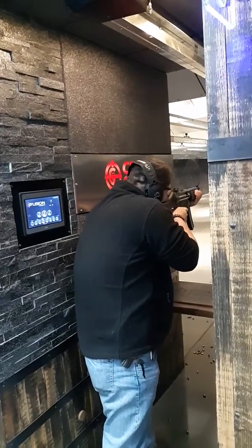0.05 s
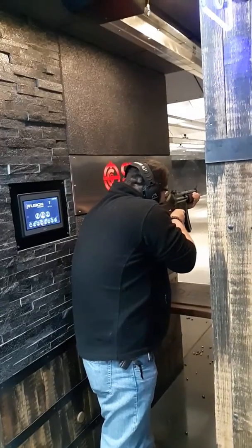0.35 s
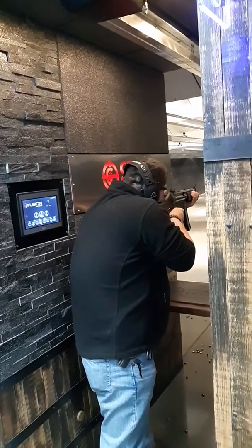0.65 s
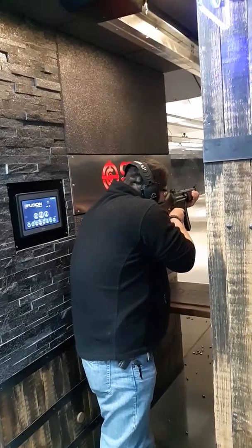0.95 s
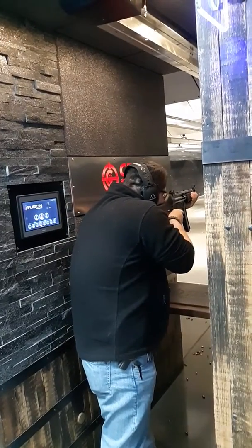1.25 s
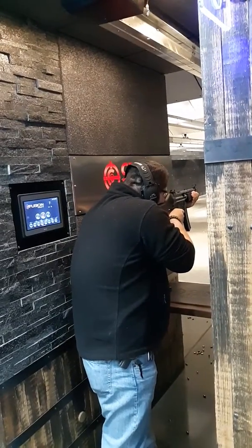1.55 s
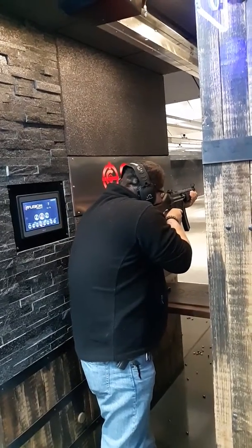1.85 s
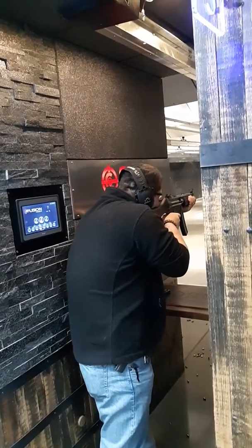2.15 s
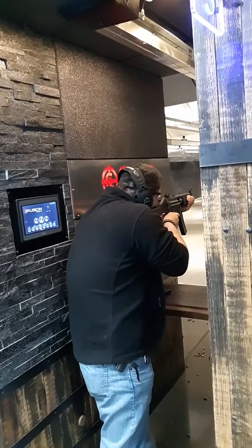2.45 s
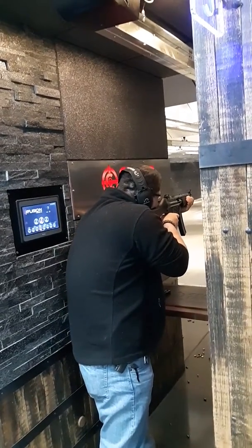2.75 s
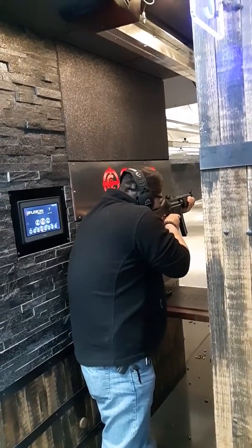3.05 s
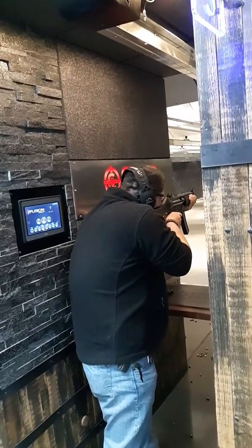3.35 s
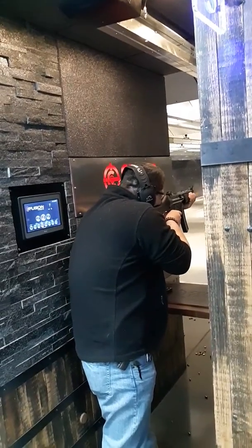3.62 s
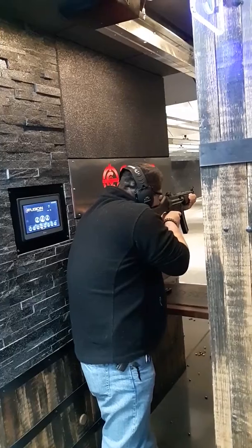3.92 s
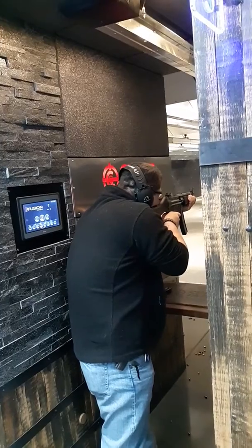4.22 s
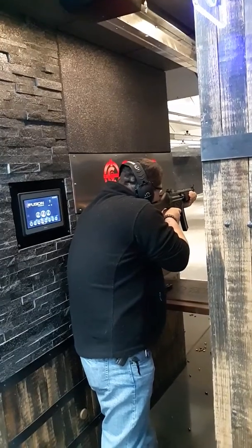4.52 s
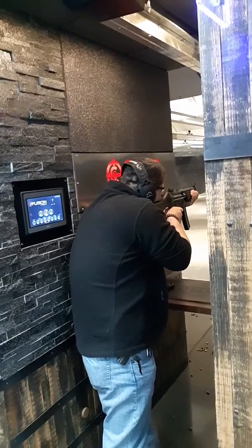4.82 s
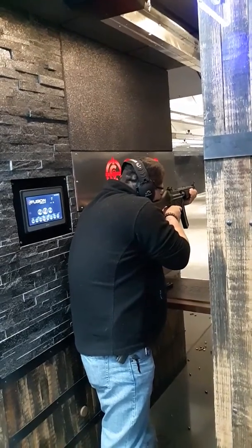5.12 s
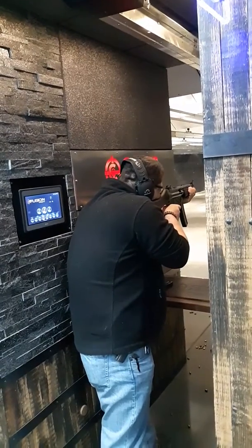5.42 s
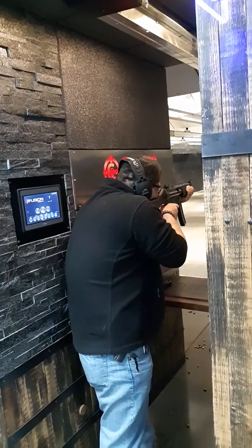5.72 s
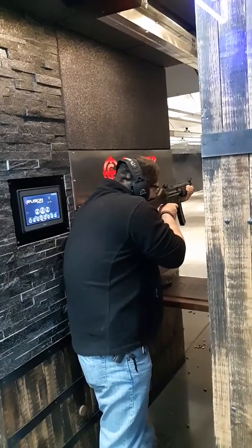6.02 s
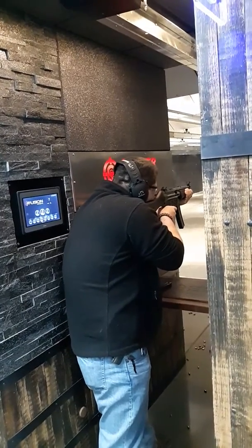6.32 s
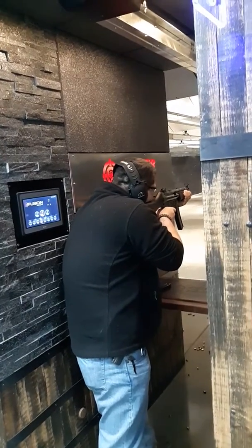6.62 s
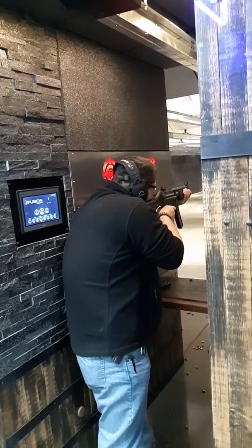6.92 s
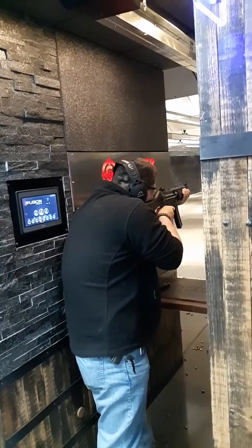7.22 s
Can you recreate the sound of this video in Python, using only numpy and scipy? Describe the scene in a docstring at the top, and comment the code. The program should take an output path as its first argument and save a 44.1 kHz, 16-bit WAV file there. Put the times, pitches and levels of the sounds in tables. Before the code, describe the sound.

The roar of a shot just fired dies away in an indoor shooting range. A submachine gun then fires three single shots, about two seconds apart, each a loud, bright blast with a metallic clack and about a second of echo. Spent brass cases bounce and ring faintly on the floor between them. Heard from behind the shooter, the reports sound flattened, and the ventilation rush drops after each one and swells back.

```python
"""First comes the roar of a shot just fired: a submachine gun on an indoor range, heard from behind.
Three more shots follow, each a clack of the action, a bright blast fluttering in the booth, two knocks
of the bolt and the long reverberation of the hall. Spent brass cases bounce and ring on the floor.
The recorder's limiter flattens each report, and its gain control ducks the rush of the ventilation,
which swells back between shots."""
import sys
import numpy as np
from scipy import signal
from scipy.fft import rfft, irfft, next_fast_len
from scipy.io import wavfile
from scipy.ndimage import uniform_filter1d, minimum_filter1d

SR = 44100
rng = np.random.default_rng(int(sys.argv[2]) if len(sys.argv) > 2 else 0)


def inscribe(sig):
    """Save sig as 16-bit PCM at rate SR to the path in sys.argv[1].

    A 1-D sig is mono; a 2-D sig holds one channel per row.
    Samples are clipped to [-1, 1] before scaling.
    """
    pcm = np.round(np.clip(np.atleast_2d(sig).T, -1, 1) * 32767)
    wavfile.write(sys.argv[1], SR, pcm.astype(np.int16))


N = 320607
AGE = np.arange(int(2.2 * SR)) / SR   # time since an event began [s]

# shots and the hall's response: (time [s], roar level [dB], low swell re roar [dB], treble lift [dB])
SHOT_EVENTS = [(-.105, -1.5, -19, 2.5), (1.7015, -2, -28.5, 4.5), (3.631, -1, -31, 4.5),
               (5.8975, -0.5, -29.5, 0.5)]
# spectrum of the muzzle blast: (frequency [Hz], relative density [dB])
BLAST_SPECTRUM = [(30, -20), (110, -31.5), (200, -5), (330, 7), (650, 3), (1100, -3.5), (2400, -8.5),
                  (4200, -11), (6500, -11.5), (8300, -24), (11500, -17.5), (15500, -23)]
# the bolt hits its rear stop, then slams shut: (delay [s], knock [dB], ring [dB], ring frequency [Hz])
BOLT_IMPACTS = [(0.038, 26.5, 24, 2840), (.058, 27.5, 31, 2190)]
# spectrum of the reverberant field: (frequency [Hz], relative density [dB])
HALL_SPECTRUM = [(30, -21), (85, -28.5), (135, -16.5), (250, -1), (600, 2.5), (1100, -5.5), (1700, -6),
                 (3000, -13), (3700, -8.5), (4900, -13), (6000, -5.5), (7100, -13.5), (7700, -24.5),
                 (11500, -17.5), (15500, -31.5)]
# narrow peaks and dips that colour the lane's reverberation: (frequency [Hz], width [Hz], lift [dB])
LANE_COLOUR = [(150.3, 8.6, 12.5), (186, 71, -2.5), (221, 69, 9), (373, 8.3, 6.5), (488, 39, -3.5),
               (551, 22, -2.5), (712, 15, 2), (1003, 17, 1), (1450, 22, -1), (1808, 30, 0), (1984, 22, 3),
               (2750, 50, -3.5), (3930, 33, -3)]
# reverberation time of the hall: (frequency [Hz], t60 [s])
REVERB_TIMES = [(50, 1.2), (130, 0.97), (250, 0.88), (550, 1.01), (1100, 0.99), (2100, 1.026), (4000, .83),
                (6000, 0.61), (9000, 0.45), (15000, 0.19)]
# cases landing: (time [s], level [dB], ring frequency [Hz], ring t60 [s], clack re level [dB])
CASE_LANDINGS = [(0.38, -29, 10600, .22, -12), (1.025, -35.5, 10650, 0.26, -15),
                 (1.52, -36, 10600, .28, -5), (2.1, -42, 10680, .35, -12), (2.496, -34, 10580, 0.36, -10),
                 (3.37, -37, 10600, 0.2, -16), (4.347, -27, 10540, .25, -14),
                 (5.238, -40.5, 10130, 0.9, 4.5), (5.704, -46.5, 10640, 0.33, -10)]
# spectrum of a case ticking on the floor: (frequency [Hz], relative density [dB])
TICK_SPECTRUM = [(2000, -20), (5400, -1), (8000, -10), (10600, 6), (13000, -7), (15500, 2)]
# spectrum of its duller clack as it tips over: (frequency [Hz], relative density [dB])
CLACK_SPECTRUM = [(2500, -25), (5400, 2), (7500, -23.5)]
# spectrum of the moving air: (frequency [Hz], relative density [dB])
VENT_SPECTRUM = [(25, -26.5), (76, -17.5), (130, -7.5), (200, -4.5), (354, 0), (545, -2.5), (962, -9),
                 (1700, -9), (2760, -16), (5880, -21), (6900, -27.5), (7800, -40.5), (11000, -38.5),
                 (16000, -52)]
# likeness of the two channels in the diffuse field: (frequency [Hz], correlation [-1 to 1])
STEREO_CORRELATION = [(50, .84), (90, .86), (140, .97), (300, .82), (640, .65), (1300, .32), (2800, 0),
                      (5400, -.07), (12000, 0)]


def gun(blast_db=37, hall_db=24, clack_db=-22, clack_t60=.08, lock_time_s=.0091, treble_hz=1100):
    """Superposition: the action clacks just before each shot; blast, bolt and reverberation follow."""
    out = np.zeros((2, N))
    booth_paths, hall_paths = noise(BLAST_SPECTRUM), noise(HALL_SPECTRUM, colour=LANE_COLOUR)
    clumps, swell = echo_clumps(), low_swell()
    for time_s, level_db, swell_db, treble_db in SHOT_EVENTS:
        roar = from_db(hall_db + level_db) * (hall(hall_paths, clumps) + from_db(swell_db) * swell)
        roar += (from_db(treble_db) - 1) * butterworth(roar, treble_hz, "high", order=1)
        add(out, time_s - lock_time_s, from_db(clack_db) * steel_knock(clack_t60))
        add(out, time_s, from_db(blast_db) * muzzle_blast(booth_paths) + bolt() + roar)
    return out


def muzzle_blast(paths, crack_t60=.12, crack_rise_s=.0015, boom_t60=.073, boom_rise_s=.012, split_hz=1000):
    """Incoherent arrivals add in power: each brings a sudden high crack and a low boom that swells."""
    pressure = vary_short_waves(paths, noise(BLAST_SPECTRUM))
    crack_power, boom_power = 0, 0
    for delay, crack_db, boom_db in blast_arrivals():
        growth = (np.maximum(AGE - delay, 0) / boom_rise_s) ** 2
        swell = 2 * growth / (1 + growth / 2)
        crack_power += (from_db(crack_db) * decay(crack_t60, delay)) ** 2
        boom_power += (from_db(boom_db) * swell * decay(boom_t60, delay)) ** 2
    onset = rise(crack_rise_s)   # the shooter's body rounds the first front
    crack = butterworth(pressure, split_hz, "high") * np.sqrt(crack_power) * onset
    boom = butterworth(pressure, split_hz, "low") * np.sqrt(boom_power)
    return crack + boom


def blast_arrivals(round_trip_s=.0236, crack_loss_db=5, boom_loss_db=3, trips=3):
    """Flutter echo between the booth walls weakens each trip: (delay [s], crack [dB], boom [dB])."""
    direct, far_wall = (0, 3.7, 1.45), (.156, -27, -27)
    flutter = [((k + 1) * round_trip_s, .4 - k * crack_loss_db, 3 - k * boom_loss_db)
               for k in range(trips)]
    return [direct, *flutter, far_wall]


def bolt(knock_t60=.093, ring_t60=.089, skirt_ratio=5.832):
    """Impact excitation: each stop of the bolt knocks the receiver into a broad, damped resonance."""
    out = 0
    for delay, knock_db, ring_db, hz in BOLT_IMPACTS:
        ring = noise([(hz / skirt_ratio, -40), (hz, 0), (hz * skirt_ratio, -40)]) * decay(ring_t60)
        hit = from_db(knock_db) * steel_knock(knock_t60) + from_db(ring_db) * ring
        out = out + np.pad(hit, [(0, 0), (int(delay * SR), 0)])[:, :len(AGE)]
    return out


def steel_knock(t60):
    """A brief contact has a wide spectrum: steel on steel gives a short, bright burst."""
    return unit_rms(butterworth(noise(BLAST_SPECTRUM), 2000, "high", order=1)) * decay(t60)


def hall(paths, clumps, rise_s=.024, linger_db=-38, linger_t60=3.22, far_hz=2200):
    """Reverberation with two slopes: the hall roars and dies away while its far end lingers faintly."""
    echoes = vary_short_waves(paths, noise(HALL_SPECTRUM, colour=LANE_COLOUR))
    far_end = butterworth(noise(HALL_SPECTRUM, colour=LANE_COLOUR), far_hz, "low")
    linger = from_db(linger_db) * far_end * decay(linger_t60)
    return (decay_by_band(echoes, clumps) + linger) * rise(rise_s)


def decay_by_band(echoes, clumps):
    """Absorption depends on frequency: each band wavers with its own gain and dies at its own rate."""
    padded = next_fast_len(len(AGE))
    hz, spectrum = np.fft.rfftfreq(padded, 1 / SR), rfft(echoes, padded)
    centres, t60s = np.transpose(REVERB_TIMES)
    shares = [at_hz(np.c_[centres, weights], hz) for weights in np.eye(len(centres))]
    bands = [irfft(spectrum * share, padded)[:, :len(AGE)] for share in shares]
    return sum(band * gain * decay(t60) for band, gain, t60 in zip(bands, clumps, t60s))


def echo_clumps(depth_db=2.5, knots_per_s=70, merge_s=.5):
    """Echo density grows with time, so clumps merge: a random gain for each band that settles to one."""
    knots = rng.standard_normal((len(REVERB_TIMES), 400))
    spread_db = depth_db * np.exp(-AGE / merge_s)
    return [from_db(spread_db * np.interp(AGE * knots_per_s, np.arange(len(row)), row)) for row in knots]


def vary_short_waves(paths, fresh, split_hz=1400):
    """Interference: long waves repeat on every shot; short ones change a little from shot to shot."""
    return butterworth(paths, split_hz, "low") + butterworth(fresh, split_hz, "high")


def low_swell(hz=149.2, delay_s=.21, rise_s=.02, t60=.46, skirt_ratio=1.3225):
    """The lowest resonance needs time to build up along the hall, so its deep hum comes late."""
    hum = noise([(hz / 4, -50), (hz / skirt_ratio, -25), (hz, 0), (hz * skirt_ratio, -45),
                 (hz * 10, -120)])
    return hum * rise(rise_s, delay_s) * decay(t60, delay_s)


def brass(tick_db=-4, tick_t60=.047, bounce_s=.0095, bounce_db=-2, touches=6, tip_s=.015, clack_t60=.1):
    """Inelastic collisions: a case clatters end to end in ever weaker touches, rings and tips over."""
    out = np.zeros((2, N))
    for time_s, level_db, hz, t60, clack_db in CASE_LANDINGS:
        delays = np.r_[0, np.cumsum(bounce_s * rng.uniform(.5, 1.5, touches - 1))]
        power = sum((from_db(k * bounce_db) * decay(tick_t60, s)) ** 2 for k, s in enumerate(delays))
        ticks = from_db(tick_db) * np.sqrt(power) * noise(TICK_SPECTRUM)
        clack = from_db(clack_db) * decay(clack_t60, tip_s) * noise(CLACK_SPECTRUM)
        add(out, time_s, from_db(level_db) * (ticks + clack + case_ring(hz, t60)))
    return out


def case_ring(hz, t60, split_hz=55, pair_db=-7, spin_hz=14, spin_depth=.45, smear_db=-3, smear_hz=170):
    """Mode splitting: the slightly oval mouth rings with two close tones that throb as it tumbles."""
    phases = rng.uniform(0, 2 * np.pi, (3, 2, 1))
    tone = np.sin(2 * np.pi * hz * AGE + phases[0])
    pair = tone + from_db(pair_db) * np.sin(2 * np.pi * (hz + split_hz) * AGE + phases[1])
    tumble = 1 + spin_depth * np.cos(2 * np.pi * spin_hz * AGE + phases[2, 0])
    envelope = decay(t60) + from_db(-26.5) * decay(t60=.85)   # the case sings on as it rolls
    jitter = unit_rms(butterworth(rng.standard_normal((2, len(AGE))), smear_hz, "low"))
    smear = from_db(smear_db) * tone * jitter * decay(t60=.19)   # the clatter blurs the tone at first
    return (pair * tumble * envelope + smear) * rise(rise_s=.007)


def ventilation(air_db=-37.5, whine_db=-75, whine_hz=10000):
    """Fan noise is broadband plus tonal: air rushes down the lanes and the drive whines faintly."""
    whine = np.sin(2 * np.pi * whine_hz * np.arange(N) / SR)
    return from_db(air_db) * noise(VENT_SPECTRUM, N) + from_db(whine_db) * whine


def noise(spectrum, size=len(AGE), colour=()):
    """A diffuse field: partly correlated stereo noise of rms 1, with optional narrow peaks and dips."""
    padded = next_fast_len(size)
    hz = np.fft.rfftfreq(padded, 1 / SR)
    colour_db = sum(db / (1 + (2 * (hz - centre) / width) ** 2) for centre, width, db in colour)
    correlation = at_hz(STEREO_CORRELATION, hz)
    mid, side = rfft(rng.standard_normal((2, padded)))
    pair = np.sqrt(1 + correlation) * mid + np.sqrt(1 - correlation) * side * [[1], [-1]]
    return unit_rms(irfft(pair * from_db(at_hz(spectrum, hz) + colour_db), padded)[:, :size])


def from_db(db):
    """Amplitude ratio of a level in decibels."""
    return 10 ** (np.asarray(db) / 20)


def unit_rms(x):
    """Normalisation to a mean power of one."""
    return x / np.sqrt(np.mean(x ** 2) + 1e-20)


def at_hz(points, hz):
    """Interpolation of a table on a log-frequency axis."""
    frequencies, values = np.transpose(points)
    return np.interp(np.log(hz + 1), np.log(frequencies), values)


def rise(rise_s, delay=0):
    """Exponential build-up from 0 to 1 after a delay."""
    return 1 - np.exp(-np.maximum(AGE - delay, 0) / rise_s)


def decay(t60, delay=0):
    """Exponential decay that starts after a delay and falls 60 dB in t60 seconds."""
    return (AGE >= delay) * from_db(-60 * np.maximum(AGE - delay, 0) / t60)


def butterworth(x, hz, side, order=2):
    """Maximally flat low-pass or high-pass filter."""
    return signal.sosfilt(signal.butter(order, hz, side, fs=SR, output="sos"), x)


def add(out, time_s, sound):
    """Superposition of a sound on the mix from time_s on."""
    start = int(round(time_s * SR))
    first, last = max(start, 0), min(start + sound.shape[-1], N)
    out[:, first:last] += sound[..., first - start:last - start]


def scene():
    """Pressures add; the right channel, on the open side of the booth, is 1 dB louder."""
    return (gun() + brass() + ventilation()) * from_db([[-.5], [.5]])


def running_level(x, window_s):
    """Short-time mean power of both channels, in dB."""
    power = uniform_filter1d(np.mean(x ** 2, axis=0), int(window_s * SR))
    return 10 * np.log10(np.maximum(power, 1e-12))


def released(reduction, per_s):
    """Peak following: a gain reduction sets in at once and lets go at a steady rate."""
    slope = per_s * np.arange(N) / SR
    return np.maximum.accumulate(reduction + slope) - slope


def gain_control(x, threshold_db=-2, depth_db=17, hold_s=.94, recover_s=.71, ease=1.98):
    """Automatic gain control: loud sound turns the gain down; it holds, then eases back up."""
    loud = np.clip((running_level(x, window_s=.0022) - threshold_db) / 2, 0, 1)
    size = int(hold_s * SR)
    held = -minimum_filter1d(-loud, size, origin=(size - 1) // 2, mode="nearest")
    ducking = np.maximum(released(held, 1 / recover_s), 0) ** ease
    return x * from_db(-depth_db * ducking)


def limiter(x, threshold_db=-10, firmness=.9, release_db_per_s=400):
    """Fast compression holds the roar near one level until it dies below the threshold."""
    over_db = np.maximum(running_level(x, window_s=.004) - threshold_db, 0)
    return x * from_db(-firmness * released(over_db, release_db_per_s))


def record(dry, overload_db=46, low_cut_hz=60, high_cut_hz=16000):
    """Saturation in the microphone flattens the peaks; the recorder compresses, clips and band-limits."""
    saturated = from_db(overload_db) * np.tanh(dry / from_db(overload_db))
    picked_up = butterworth(saturated, low_cut_hz, "high", order=1)
    squeezed = np.clip(limiter(gain_control(picked_up)), -1, 1)
    return signal.sosfilt(signal.ellip(10, .1, 70, high_cut_hz, fs=SR, output="sos"), squeezed)


dry = scene()
out = record(dry)
inscribe(out)
```